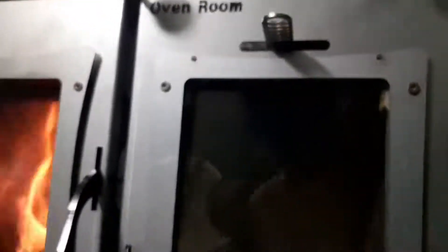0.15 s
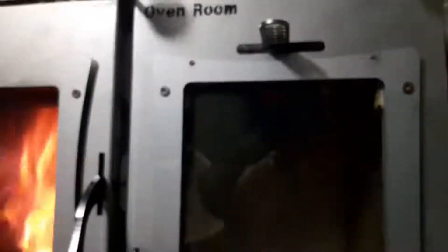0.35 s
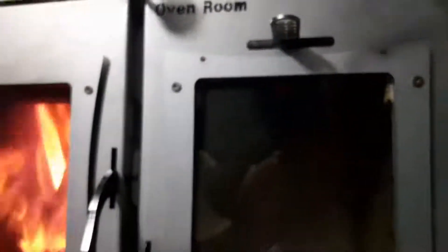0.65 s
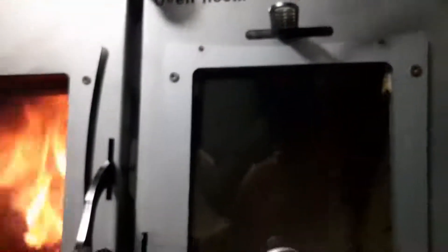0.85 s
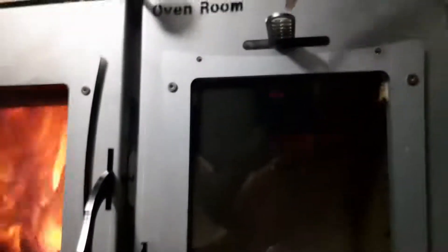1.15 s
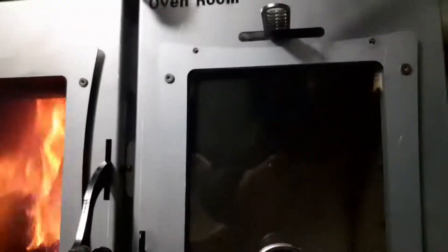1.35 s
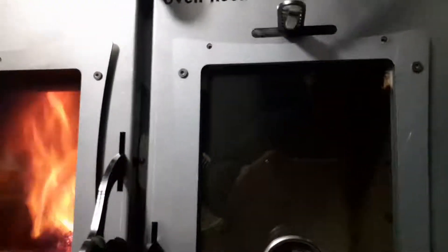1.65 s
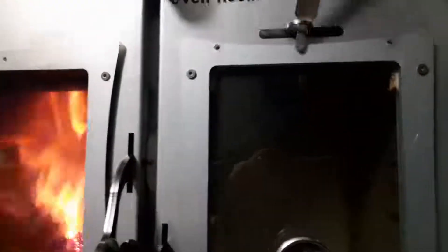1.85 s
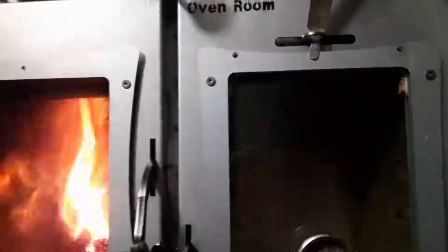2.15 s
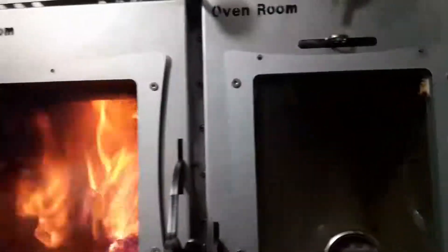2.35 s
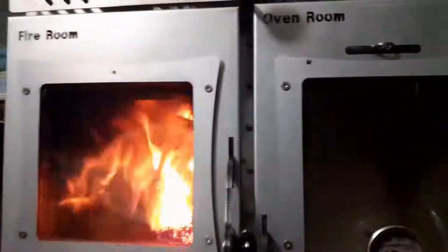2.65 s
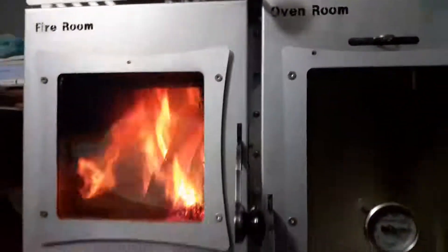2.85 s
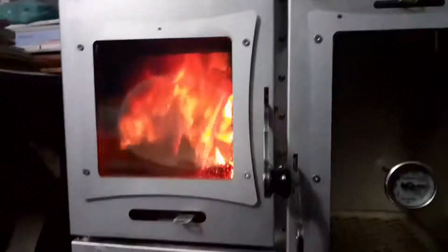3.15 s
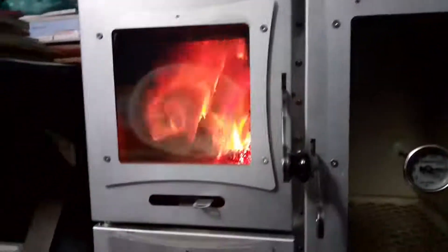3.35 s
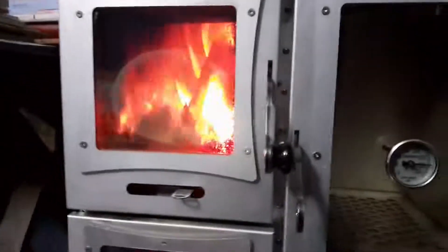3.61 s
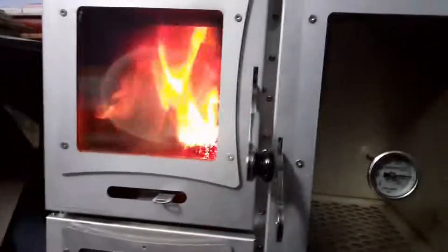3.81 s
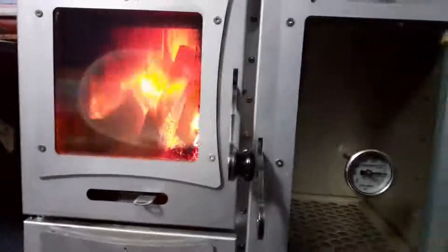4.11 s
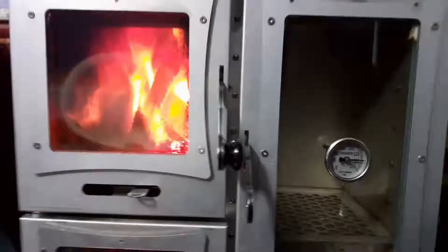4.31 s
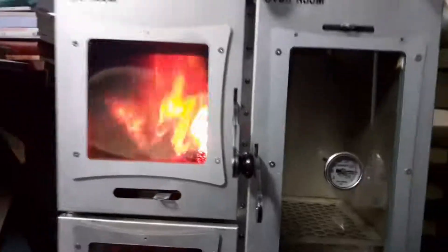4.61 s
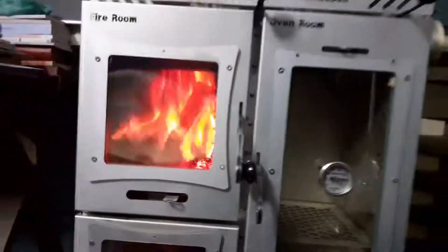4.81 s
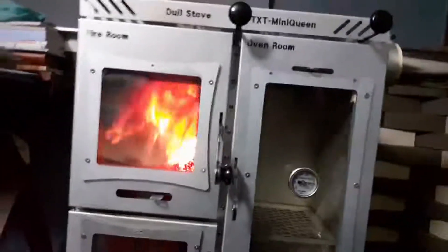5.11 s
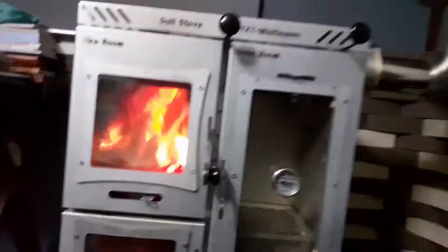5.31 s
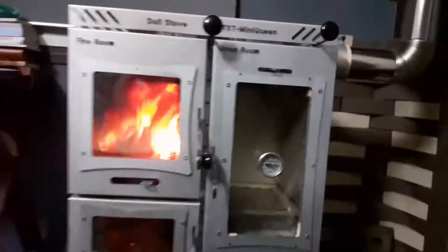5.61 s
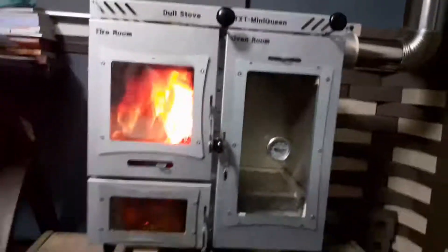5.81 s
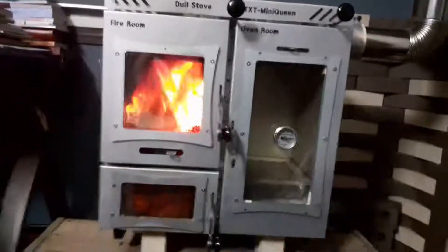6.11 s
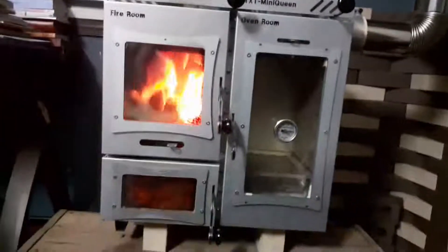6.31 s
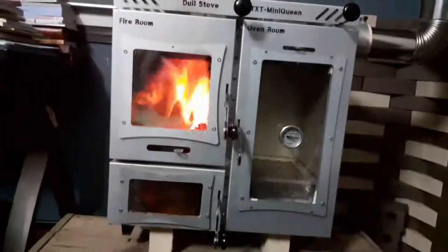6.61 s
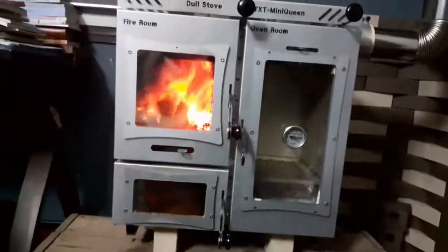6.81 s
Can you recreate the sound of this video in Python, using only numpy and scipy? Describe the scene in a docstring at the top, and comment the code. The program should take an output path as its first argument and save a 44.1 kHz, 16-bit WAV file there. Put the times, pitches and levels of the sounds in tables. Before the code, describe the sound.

In a hard-surfaced room, a close handheld stereo microphone catches cloth movement and low handling bumps over a steady, quiet fire draught. First comes a gritty metal slider scrape, in several pushes; then a sharp, bright latch clack with a short rattle. Half a second later the oven door drags across its frame in a rapid stuttering squeal with small thuds. Afterwards only faint rustles, dry ticks and skin brushing remain, slightly to the left.

```python
"""Wood stove slider, latch and door

A metal slider grates along its slot, a latch knocks, then the oven door judders and squeaks over its frame.
Friction is noise with a fluctuating envelope, impacts are impulses and decaying noise, and damped
resonances give the steel its ring. Close by, a sleeve rustles, fingers brush and low bumps swell,
over small dry ticks and the steady low noise of the fire. Echoes and a diffuse tail form the hard room.
"""
import sys
import numpy as np
from scipy import signal
from scipy.fft import rfft, irfft, next_fast_len
from scipy.io import wavfile
from scipy.ndimage import map_coordinates

SR = 44100
rng = np.random.default_rng(int(sys.argv[2]) if len(sys.argv) > 2 else 0)


def digitize_waveform(pressure):
    """Quantize a signal to 16-bit integers and store it at the path in sys.argv[1].

    Rows of a 2-D input are taken as channels; values are limited to [-1, 1].
    """
    field = np.atleast_2d(pressure).T
    bounded = np.clip(field, -1, 1)
    quanta = np.round(bounded * 32767).astype(np.int16)
    wavfile.write(sys.argv[1], SR, quanta)


N = 307087
TIME = np.arange(N) / SR


def undb(db):
    """Level law: decibels to amplitude gain."""
    return 10 ** (np.asarray(db) / 20)


def unit(x):
    """Normalization to a root-mean-square value of 1."""
    return x / np.sqrt(np.mean(x ** 2))


def along(points, hz):
    """Interpolation of (frequency, value) points on a logarithmic frequency axis."""
    f, value = np.transpose(points)
    return np.interp(np.log(np.maximum(hz, 1)), np.log(f), value)


def shape(x, gain):
    """Filtering by multiplication in the frequency domain; gain is a function of frequency."""
    size = next_fast_len(N + SR)
    spectrum = rfft(x, size) * gain(np.fft.rfftfreq(size, 1 / SR))
    return irfft(spectrum, size)[..., :N]


def response(points, size=4096):
    """Minimum-phase principle: folding the cepstrum gives a causal response, here of unit energy."""
    hz = np.maximum(np.fft.rfftfreq(size, 1 / SR), 1)
    octaves_below = np.maximum(np.log2(points[0][0] / hz), 0)
    octaves_above = np.maximum(np.log2(hz / points[-1][0]), 0)
    level_db = along(points, hz) - 18.4 * (octaves_below + octaves_above)
    cepstrum = irfft(np.log(undb(level_db)))
    cepstrum[1:size // 2] *= 2
    cepstrum[size // 2 + 1:] = 0
    h = irfft(np.exp(rfft(cepstrum)))
    return h / np.linalg.norm(h)


def through(x, h):
    """Linear system: a pair of signals is convolved with an impulse response."""
    return signal.fftconvolve(x, np.atleast_2d(h), axes=1)[:, :N]


def resonances(rows):
    """Damped modes, neighbours opposed in sign and the side in quadrature; the mid has unit energy."""
    t = TIME[:SR // 4]
    ring = 0
    for k, (hz, width, db) in enumerate(rows):
        turn = 2 * np.pi * hz * t
        build_up = 1 - np.exp(-hz * t / 2)  # over a few cycles
        fade = np.exp(-np.pi * width * t) * build_up
        mid = (-1) ** k * np.sin(turn)
        side = (-1) ** (k // 2) * np.cos(turn)
        ring = ring + undb(db) * width * fade * np.array([mid, side])
    return ring / np.linalg.norm(ring[0])


def flutter(hz, depth_db):
    """Random modulation: a unit-rms gain that takes a new random level hz times a second."""
    steps = rng.standard_normal(N // 16)
    wander = np.interp(TIME * hz, np.arange(len(steps)), steps)
    return unit(undb(depth_db * wander))


def contacts(hz, rough_db):
    """Friction as modulated noise: tiny collisions bunch into catches and slips; mid and side."""
    return rng.standard_normal((2, N)) * flutter(hz, rough_db)


def bursts(rows):
    """Impact chatter: each blow is noise whose amplitude decays exponentially."""
    force = np.zeros(N)
    for start, db, length in rows:
        age = TIME[TIME >= start] - start
        force[N - len(age):] += undb(db) * np.exp(-age / length)
    return force * rng.standard_normal((2, N))


def blows(rows):
    """Impulsive excitation: one clean push per blow, with the mean energy of its chatter."""
    force = np.zeros((2, N))
    for start, db, length in rows:
        force[:, int(start * SR)] += undb(db) * np.sqrt(length * SR / 2)
    return force


def stroke(start, length, attack_s, release_s, sag_db_per_s=0):
    """Envelope of one push: linear rise, hold or sag for its length, then exponential decay."""
    age = np.maximum(TIME - start, 0)
    rise = np.minimum(age / attack_s, 1)
    held = undb(-sag_db_per_s * np.minimum(age, length))
    return rise * held * np.exp(-np.maximum(age - length, 0) / release_s)


def swells(rows, axis=2):
    power = sum(undb(row[axis]) ** 2 * np.exp(-((TIME - row[0]) / row[1]) ** 2) for row in rows)
    return np.sqrt(power)


def waver(x, share, hz):
    """Doppler principle: a varying delay bends pitch by about this share, wandering hz times a second."""
    drift = np.log(flutter(hz, 20 / np.log(10)))  # standard deviation near 1
    lag = (drift - drift.mean()) * share / hz
    return np.array([map_coordinates(channel, [(TIME - lag) * SR], order=3) for channel in x])


# steel panel modes: (frequency [Hz], relative peak response [dB], 60 dB decay time [s])
PANEL_MODES = [(209.8, 0, 0.41), (344, -4, 1), (502, 14, .5), (500, 2, 0.61), (552, 2, 0.22),
               (597, -1.5, 0.27), (785, -1.5, 0.43), (1345, 13, 0.21), (1380, -7.5, 0.098), (1450, 2, 1),
               (1720, -8.5, 0.36), (1856, 8, 0.32), (2140, -3, 0.38), (2430, -7, 0.14),
               (2745, -14.5, 0.203), (2960, -2.5, 0.31), (3130, -6.5, 0.14), (2900, -6, 0.27),
               (4200, -13, .23), (4750, -12, .3), (5949, -6, 0.29)]


def panel(x, ring_db):
    """Modal resonance: the steel panels ring on after whatever shakes them."""
    t = TIME[:SR]
    ring = np.zeros(SR)
    for hz, db, t60 in PANEL_MODES:
        ring += undb(db) / t60 * np.sin(2 * np.pi * hz * t) * undb(-60 * t / t60)
    return x + undb(ring_db) * through(x, ring * 2 * np.log(1000) / SR)


# reverberation of the hard room: (frequency [Hz], 60 dB decay time [s])
ROOM_DECAY = [(120, 0.8), (400, 0.58), (1500, 0.28), (5000, 0.32), (14000, 0.15)]
# reflections off small steel parts, before the high-pass: (delay [s], mid gain [ratio], side gain [ratio])
NEAR_ECHOES = [(.0017, 0.26, -0.28), (.0042, -0.2, 0.28), (.0069, .28, .25), (0.012, -0.17, -0.19)]


def room(x, wet_db):
    """Early reflections and diffuse decay: small surfaces return the treble, the tail keeps its bass longest."""
    count = SR * 3 // 4
    hz, t, cells = signal.stft(rng.standard_normal((2, count)), SR, nperseg=256)
    decay = np.exp(-np.log(1000) * t / along(ROOM_DECAY, hz)[:, None])
    build_up = 1 - np.exp(-t / 0.0061)
    tail = signal.istft(cells * decay * build_up, SR)[1]
    early = np.zeros_like(tail)
    for delay, mid, side in NEAR_ECHOES:
        early[:, int(delay * SR)] += mid, side
    paths = signal.sosfilt(signal.butter(2, 2600, "high", fs=SR, output="sos"), early)
    paths += undb(wet_db) * tail / np.linalg.norm(tail, axis=1, keepdims=True)
    paths[:, 0] += .9  # direct sound
    return through(x, paths)


# stereo width: (frequency [Hz], gain of the side [dB])
SIDE_WIDTH = [(60, -12), (200, -14), (400, -10), (750, -6), (1400, 0), (8000, 0), (15000, -1.5)]
# shape of the leftward tilt, scaled by each source's lean: (frequency [Hz], left minus right [dB])
LEFT_TILT = [(100, 5.5), (400, 2), (1300, 6.5), (2400, 5), (4400, 2), (15000, 1.5)]


def ports(pair, lean, shared=.13):
    """Spaced reception: mid and side become left and right, part of the side being the mid in quadrature."""
    quadrature = shape(pair[0], lambda hz: -1j)
    side = np.sqrt(1 - shared) * pair[1] + np.sqrt(shared) * quadrature
    side = shape(side, lambda hz: undb(along(SIDE_WIDTH, hz)))
    tilt = np.array([[lean], [-lean]]) / 2
    left_right = np.array([pair[0] + side, pair[0] - side])
    return shape(left_right, lambda hz: undb(tilt * along(LEFT_TILT, hz)))


# low rumble spectrum, shared by fire, bumps and slider: (frequency [Hz], relative level [dB])
RUMBLE_SPECTRUM = [(13, -51), (22, -16), (45, -11.5), (70, 1.5), (160, -9.5), (210, -34.5), (350, -120)]


def fire():
    """Low-frequency flow noise: the draught rumbles steadily in the firebox, wandering a little."""
    draught = contacts(7.8, 1.0) * flutter(3.6, depth_db=1)
    return undb(-62) * through(draught, response(RUMBLE_SPECTRUM))


# soft cloth spectrum: (frequency [Hz], relative level [dB])
RUB_SPECTRUM = [(71, -27.5), (120, -6), (176, -5.5), (205, 1), (238, -2.5), (274, -2.5), (587, -5.5),
                (989, -9.5), (2500, -21), (3250, -45.5), (5500, -120)]
# crisp cloth spectrum: (frequency [Hz], relative level [dB])
SWISH_SPECTRUM = [(880, -28.5), (1500, -4), (3120, 0), (5500, -4.5), (14900, -5), (15500, -6.5)]
# arm movements: (middle [s], half length [s], relative rub level [dB], relative swish level [dB])
ARM_MOVEMENTS = [(.42, 0.32, -56.5, -55.5), (1.16, 0.15, -63, -69.5), (1.49, .04, -63.5, -63.5),
                 (2.42, 0.49, -62, -62), (2.94, 0.15, -56.5, -49.5), (3.42, 0.18, -55.5, -49),
                 (3.86, 0.45, -55.5, -56), (4.37, 0.12, -54.5, -47.5), (4.7, 0.14, -60, -58),
                 (4.93, 0.097, -58.5, -54), (5.2, .14, -65, -63.5), (5.62, 0.13, -58.5, -58.5),
                 (5.94, 0.12, -57, -54.5), (6.4, 0.28, -65.5, -62.5)]
REST_RUB_DB, REST_SWISH_DB = -68.5, -72.5  # cloth stirring between movements, before the layer gains


def sleeve():
    """Fibre friction: cloth rubs softly and swishes as the arm moves."""
    rub_force = np.hypot(swells(ARM_MOVEMENTS), undb(REST_RUB_DB))
    swish_force = np.hypot(swells(ARM_MOVEMENTS, axis=3), undb(REST_SWISH_DB))
    rub = through(contacts(40, 0.5) * rub_force, response(RUB_SPECTRUM))
    swish = through(contacts(600, 1.3) * swish_force, response(SWISH_SPECTRUM))
    return undb(4.0) * rub + undb(0.76) * swish


# low bumps as the recorder is handled, the latch drops and the door thuds:
# (middle [s], half length [s], relative level [dB])
BUMP_SWELLS = [(.2, .14, -56.5), (.68, .1, -59), (1.17, .08, -62), (2.42, .06, -59), (2.86, 0.069, -55),
               (3.48, 0.14, -52), (4.12, 0.11, -53), (4.42, 0.033, -56.5), (6.03, 0.065, -59),
               (6.92, .06, -54)]


def low_bumps():
    """Structure-borne noise: low bumps as the recorder is handled, the latch drops and the door thuds."""
    return through(contacts(9, .8) * swells(BUMP_SWELLS), response(RUMBLE_SPECTRUM))


# small ticks and crinkles: (time [s], relative level [dB], decay time [s])
TICK_EVENTS = [(1.073, -53.5, 0.046), (1.255, -61.5, 0.038), (3.453, -26.5, 0.0018), (5.362, -32, 0.00065),
               (5.373, -49, 0.00067), (5.546, -43, 0.0036), (5.76, -31, 0.00081)]
# tick spectrum: (frequency [Hz], relative level [dB])
TICK_SPECTRUM = [(400, 1.5), (1800, -9), (3000, -1.5), (6000, -7.5), (10000, -3.5), (15000, -7.5)]
# light dry taps: (time [s], relative level [dB], decay time [s])
TAP_EVENTS = [(1.072, -53, 0.0066), (3.283, -34.5, 0.0029), (3.2915, -36.5, 0.0022), (6.568, -51.5, 0.025),
              (6.629, -46.5, 0.0056)]
# tap spectrum: (frequency [Hz], relative level [dB])
TAP_SPECTRUM = [(400, -9), (750, 4), (1600, 2.5), (2600, -5), (4000, -8.5), (7000, -30)]


def ticks():
    """Transient noise: small dry ticks, crinkles and duller taps decay at once."""
    crisp = through(bursts(TICK_EVENTS), response(TICK_SPECTRUM))
    dull = through(bursts(TAP_EVENTS), response(TAP_SPECTRUM))
    return room(crisp + dull, wet_db=-13)


# shoves of the hand: (start [s], length [s], relative force [dB], relative tongue singing [dB])
HAND_SHOVES = [(1.525, 0.033, -8, -50), (1.591, 0.024, -11, -52), (1.664, 0.14, -7.5, -40),
               (1.789, 0.032, -5.5, -33), (1.852, 0.03, -1, -46), (1.871, 0.098, -1, -40.5),
               (1.978, 0.031, 1.5, -37.5), (2.026, 0.018, -1.5, -52)]


def shoves(axis):
    """Envelope maximum: one level column of the shoves as a gain, the strongest shove prevailing."""
    pushes = [undb(row[axis]) * stroke(row[0], row[1], attack_s=0.011, release_s=0.032)
              for row in HAND_SHOVES]
    return np.max(pushes, axis=0)


# slider catching on its slot: (time [s], relative level [dB], chatter decay time [s])
SLIDER_CATCHES = [(1.535, -35, 0.0064), (1.554, -39, 0.0025), (1.682, -40, 0.016), (1.806, -36, 0.0057),
                  (1.885, -26.5, 0.013), (1.924, -42, .004), (2.001, -40, 0.004), (2.014, -18.5, 0.0029)]
# coarse grinding spectrum: (frequency [Hz], relative level [dB])
GRIND_SPECTRUM = [(180, -21), (300, 0), (389, -7.5), (424, -9.5), (468, 2.5), (550, -4), (587, -7),
                  (676, -5), (868, -3), (946, -6), (1210, -6), (1400, -2.5), (2230, -8.5), (2510, -16),
                  (4000, -19), (5200, -42), (8800, -120)]
# fine grit spectrum: (frequency [Hz], relative level [dB])
GRIT_SPECTRUM = [(1470, -37), (2500, -2.5), (5160, -7), (6440, -5.5), (9290, -9), (12600, -7.5),
                 (13900, -10), (14900, -21), (15500, -7.5)]
# modes of the slider's tongue: (frequency [Hz], width [Hz], relative level [dB])
TONGUE_MODES = [(992, 37, -5), (1084, 34, -5.5), (1208, 38, -9.5), (1394, 31, -6), (1816, 49, -10.5),
                (2584, 60, -14)]
# modes of the slider groaning under force: (frequency [Hz], width [Hz], relative level [dB])
GROAN_MODES = [(596, 25, -4), (679, 37, 0), (827, 27, 1), (930, 36, -4.5), (1103, 40, -3)]
# modes of the loose slider: (frequency [Hz], width [Hz], relative level [dB])
LOOSE_MODES = [(1327, 28, 2.5), (2004, 40, -6), (2590, 40, -8.5), (2930, 33, -7)]
# modes of the oven box: (frequency [Hz], width [Hz], relative level [dB])
BOX_MODES = [(57, 6.2, 1), (82.6, 13, -7), (150.5, 18, -1.5), (216, 25, 6), (256, 21, -24), (340.5, 9.6, 3),
             (389, 16, 1.5), (498, 19, -4), (610, 32, 1), (660, 23, 1), (759, 40, -1.5)]
# growth of each layer [dB per dB of force]
GRIT_GROWTH, DRONE_GROWTH, GROAN_GROWTH, SHUDDER_GROWTH = 0.98, 1.57, 3.3, 0.32
STICK_SLIP_HZ, STICK_SLIP_DB = 64.88, 1.5  # unevenness of the slider's progress
TONGUE_WAVER, TONGUE_WAVER_HZ = 0.0177, 14  # pitch shift [share] and its rate as the contact point moves


def slider():
    """Dry friction: force drives grind and grit, while groan and box drone grow faster than the force."""
    # the slider slips back a little as it is let go
    slip = stroke(2.297, 0.084, attack_s=0.019, release_s=.02, sag_db_per_s=66)
    force = shoves(axis=2) * flutter(STICK_SLIP_HZ, STICK_SLIP_DB) + undb(-12.5) * slip
    catches = bursts(SLIDER_CATCHES)

    grind = undb(-33.5) * contacts(170, 4.1) * force + undb(-5.5) * catches
    grit = undb(-34) * contacts(430, 1.7) * force ** GRIT_GROWTH + undb(-2.5) * catches
    song = undb(1.0) * through(contacts(120, 2.0) * shoves(axis=3), resonances(TONGUE_MODES))
    groan = undb(-36) * through(contacts(120, 2.3) * force ** GROAN_GROWTH, resonances(GROAN_MODES))
    release = undb(-46) * through(contacts(96, 1.6) * slip, resonances(LOOSE_MODES))
    drone = undb(-35.5) * through(contacts(60, 1.9) * force ** DRONE_GROWTH, resonances(BOX_MODES))
    shudder_force = contacts(14, 0.92) * force ** SHUDDER_GROWTH
    shudder = undb(-51) * through(shudder_force, response(RUMBLE_SPECTRUM))

    bent = waver(song + groan, TONGUE_WAVER, TONGUE_WAVER_HZ)
    body = through(grind, response(GRIND_SPECTRUM)) + bent + drone + release
    bright = through(grit, response(GRIT_SPECTRUM))
    return room(body, wet_db=-6.5) + room(bright, wet_db=-11) + shudder


# latch knocks: (time [s], relative level [dB], rattle decay time [s])
LATCH_KNOCKS = [(3.4528, -11, 0.0048), (3.4605, -21, 0.0068), (3.481, -34, 0.0087), (3.548, -34, 0.012)]
# latch bar modes: (frequency [Hz], width [Hz], relative level [dB])
LATCH_MODES = [(507, 68, -9), (845, 26, 3), (1330, 50, 1), (1437, 21, -0.5), (1584, 57, 1.5), (1765, 36, 5),
               (2243, 49, -5), (2770, 60, -4), (3180, 150, -12), (4180, 180, -13.5), (5170, 170, -18.5)]
# rattle spectrum: (frequency [Hz], relative level [dB])
RATTLE_SPECTRUM = [(120, -55), (200, -19), (560, -2.5), (624, -16.5), (818, -1.5), (1040, -23),
                   (1290, -1.5), (1780, -17), (2060, -17), (2250, -15), (2460, -17.5), (3060, -29.5),
                   (6300, -30), (6900, -28.5), (15000, -48)]


def latch():
    """Impact and modal decay: the bar slides off its rest, drops on the door, rings and rattles to rest."""
    slide = undb(-30) * contacts(300, 2.5) * stroke(3.436, 0.02, attack_s=.008, release_s=.005)
    bar = undb(-.5) * through(blows(LATCH_KNOCKS) + slide, resonances(LATCH_MODES))
    rattle = undb(-6.0) * through(bursts(LATCH_KNOCKS) + slide, response(RATTLE_SPECTRUM))
    return room(panel(bar + rattle, ring_db=-14.5), wet_db=-6.5)


# spectrum of the door brushing its seal: (frequency [Hz], relative level [dB])
SEAL_SPECTRUM = [(350, -28.5), (600, -13.5), (979, -23.5), (1220, -13), (2190, -11), (3290, -5.5),
                 (4940, -12), (5510, -13.5), (7140, -15.5), (15500, -17.5)]
# spectrum of the door dragging on its frame: (frequency [Hz], relative level [dB])
DRAG_SPECTRUM = [(88, -55), (150, -21.5), (217, -5.5), (381, -8.5), (561, -3.5), (681, -9), (812, -4),
                 (966, -14), (1600, -4.5), (1870, -7), (2920, -21.5), (5650, -15.5), (6110, -12),
                 (10300, -22), (15500, -20.5)]
# modes of the rubbing door edge: (frequency [Hz], width [Hz], relative level [dB])
EDGE_MODES = [(225.6, 18, -16), (244, 30, 0.5), (515, 25, 1), (565, 68, 0.5), (836, 44, 3), (1066, 38, 3),
              (1246, 40, -3.5), (1643, 22, 6), (1790, 21, 2), (2258, 20, 7), (2403, 21, -4),
              (2710, 55, 2.5), (2840, 10, -19), (2935, 12, 7), (4220, 70, -2.5), (4790, 17, 0.5),
              (5290, 34, -12), (6100, 52, -11), (7330, 76, -18), (9000, 78, -9), (12360, 150, -14)]
# jolts as the door slips free: (time [s], relative level [dB], chatter decay time [s])
DOOR_JOLTS = [(4.0372, -11, 0.0063), (4.0885, -14, 0.013), (4.116, -22, .005), (4.128, -13.5, .007),
              (4.158, -20.5, 0.0083), (4.176, -16, 0.0042), (4.207, -20, 0.0086)]
# modes of the frame's lip, which the jolts strike: (frequency [Hz], width [Hz], relative level [dB])
LIP_MODES = [(1230, 130, -13), (2310, 200, -6.5), (2834, 205, 2), (3680, 960, -5), (4700, 210, -13.5),
             (5170, 160, -6.5), (6030, 302, -13), (7420, 500, -21)]
# thuds of the door on its frame, pushed by slider or hand: (time [s], relative level [dB], decay time [s])
DOOR_THUDS = [(1.88, -33, .025), (2.032, -30, 0.017), (4.013, -28.5, 0.03), (4.09, -32, 0.022),
              (4.118, -26, 0.029), (4.195, -35.5, .015)]
# low modes of the door leaf: (frequency [Hz], width [Hz], relative level [dB])
LEAF_MODES = [(85, 18, -11), (207.4, 19, 2), (238, 22, -0.5), (391, 24, -4), (440, 55, 5.5), (506, 28, -5),
              (562.5, 18, 10.5), (736, 21, -7), (831, 28, -2)]
SWING_S, CONTACT_S = 3.767, 4.012  # the door starts along its seal, then meets the frame


def door():
    """Stick-slip and impact: the door brushes its seal, thuds on the frame, catches and judders across."""
    speed = stroke(SWING_S, CONTACT_S - SWING_S, attack_s=.17, release_s=.12)
    sweep = undb(-33.5) * through(contacts(500, 1.1) * speed ** 1.34, response(SEAL_SPECTRUM))
    # the drag weakens as the door slows
    rubbing = undb(-19.5) * stroke(CONTACT_S, 0.17, attack_s=0.01, release_s=0.037, sag_db_per_s=10.5)
    drag = undb(-5.0) * through(contacts(260, 3.9) * rubbing, response(DRAG_SPECTRUM))
    edge = undb(-6.0) * through(contacts(150, 3.5) * rubbing, resonances(EDGE_MODES))
    strikes = undb(-6.5) * blows(DOOR_JOLTS) + undb(-4) * bursts(DOOR_JOLTS)
    jolts = through(strikes, resonances(LIP_MODES))
    thuds = through(undb(-2.0) * bursts(DOOR_THUDS), resonances(LEAF_MODES))
    body = panel(drag + jolts, ring_db=-8.0) + edge + thuds + squeaks()
    return room(body, wet_db=-12.5) + sweep


# squeaks of steel on steel: (middle [s], half length [s], pitch [Hz], relative level [dB])
STEEL_SQUEAKS = [(4.048, 0.0043, 4790, -22), (4.058, 0.0079, 11070, -27), (4.105, 0.021, 5960, -24.5),
                 (4.108, 0.02, 2144, -23.5), (4.096, .016, 14540, -46.5), (4.151, .014, 15348, -33),
                 (4.165, 0.04, 11210, -36), (4.166, 0.0096, 1590, -23), (4.221, 0.049, 1603, -30.5)]


def squeaks():
    """Stick-slip oscillation: friction locks on to one pitch for a moment, wavering."""
    out = np.zeros((2, N))
    for at, half, hz, db in STEEL_SQUEAKS:
        pitch = hz + 14 * np.log(flutter(200, 9.0))
        phase = 2 * np.pi * np.cumsum(pitch) / SR
        offsets = rng.uniform(0, 2 * np.pi, (2, 1))  # mid and side start apart
        out += undb(db) * np.exp(-((TIME - at) / half) ** 2) * np.sin(phase + offsets)
    return out


# brushes of the fingers near the left port: (middle [s], half length [s], relative level [dB])
FINGER_BRUSHES = [(5.53, 0.045, -50), (5.675, 0.063, -47.5), (5.745, 0.015, -39), (6.252, 0.012, -43.5),
                  (6.305, 0.023, -45), (6.545, 0.043, -50)]
# spectrum of skin on the case: (frequency [Hz], relative level [dB])
SKIN_SPECTRUM = [(1800, -16), (2900, 1), (5000, -6), (8000, -2.5), (13000, -5.5), (15500, -7)]


def fingers():
    """Proximity: skin brushes the case, far nearer to the left port than to the right."""
    brushes = through(contacts(500, 2.2) * swells(FINGER_BRUSHES), response(SKIN_SPECTRUM))
    return brushes * undb(np.array([[-.5], [-14]]))


# extra lean of the near sounds as the grip changes: (time [s], left minus right [dB])
GRIP_LEAN = [(4.9, 0.04), (5.5, 1.5)]


def scene():
    """Superposition: the stove's sounds and the near sounds add, all leaning a little to the left."""
    lean_db = np.interp(TIME, *np.transpose(GRIP_LEAN))
    near = ports(fire() + sleeve() + low_bumps() + ticks(), lean=0.61, shared=0.0494)
    near = near * undb(np.array([lean_db, -lean_db]) / 2)
    return near + ports(slider() + door(), lean=0.62) + ports(latch(), lean=1.12) + fingers()


def record(dry):
    """Band limitation: a steep elliptic low-pass cuts the top above 15.7 kHz."""
    return signal.sosfilt(signal.ellip(10, .2, 80, 15700, fs=SR, output="sos"), dry)


dry = scene()
out = record(dry)
digitize_waveform(out)
```